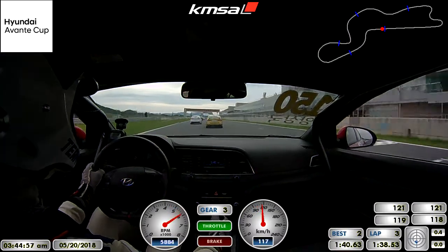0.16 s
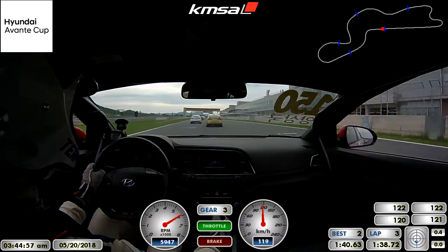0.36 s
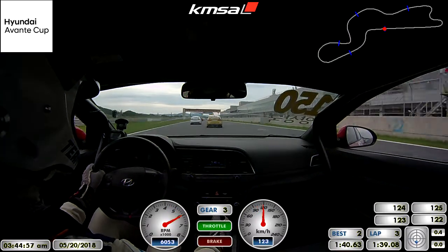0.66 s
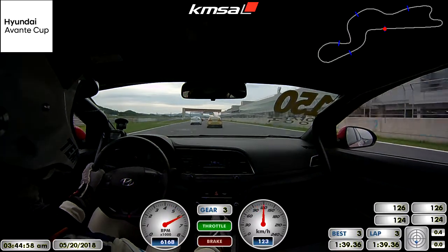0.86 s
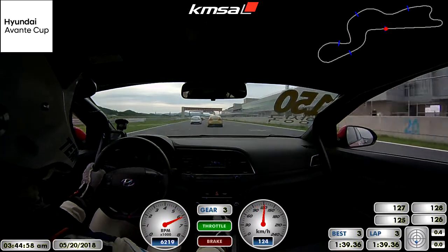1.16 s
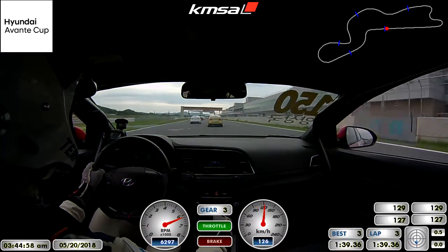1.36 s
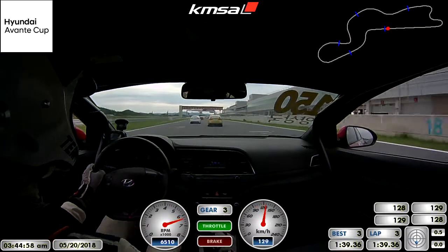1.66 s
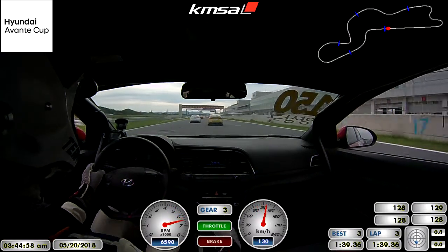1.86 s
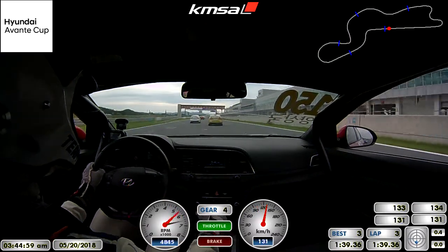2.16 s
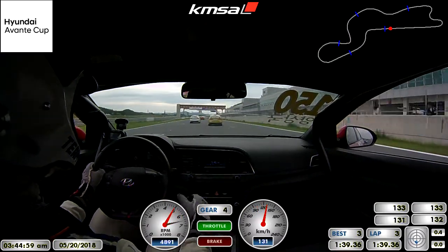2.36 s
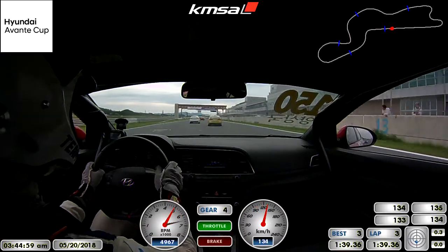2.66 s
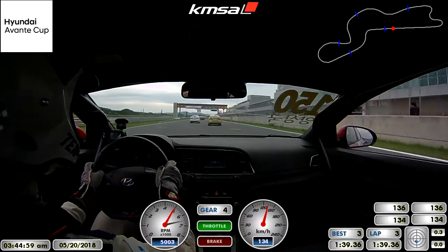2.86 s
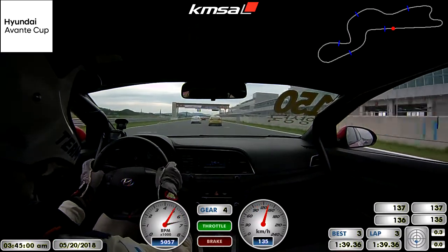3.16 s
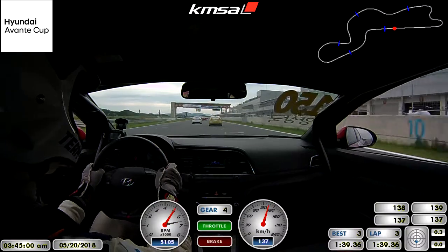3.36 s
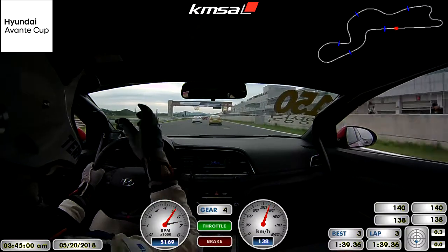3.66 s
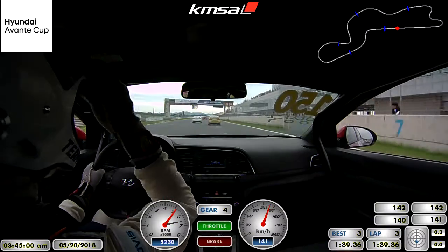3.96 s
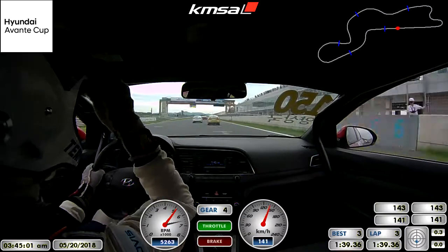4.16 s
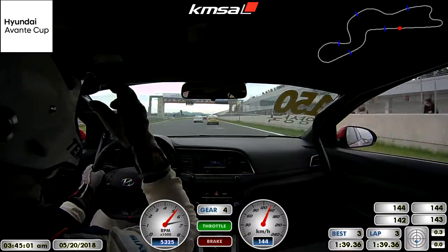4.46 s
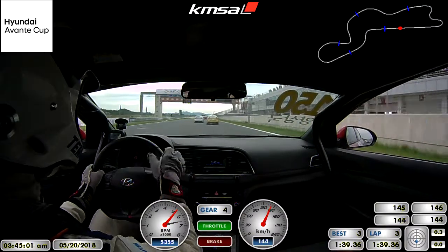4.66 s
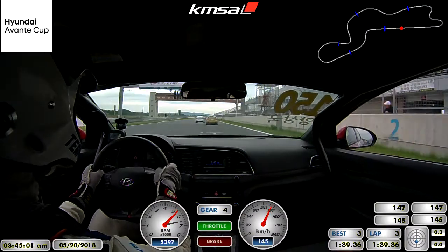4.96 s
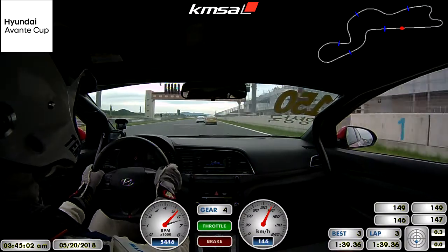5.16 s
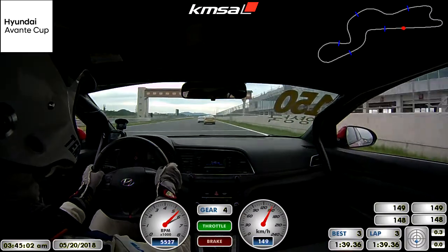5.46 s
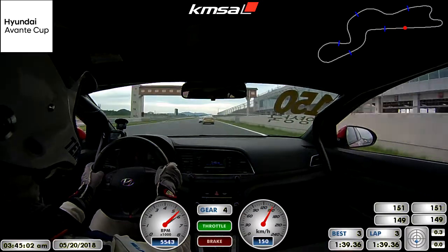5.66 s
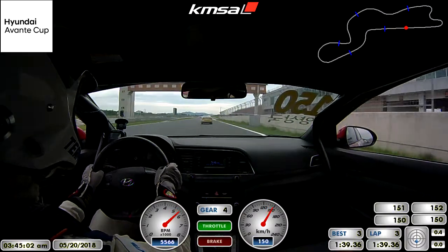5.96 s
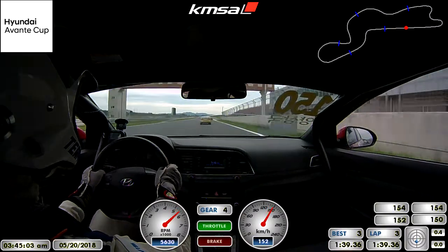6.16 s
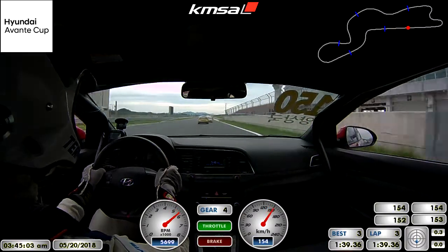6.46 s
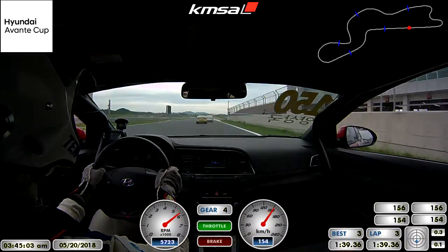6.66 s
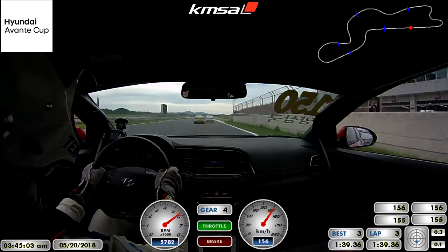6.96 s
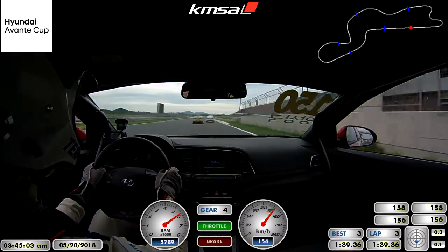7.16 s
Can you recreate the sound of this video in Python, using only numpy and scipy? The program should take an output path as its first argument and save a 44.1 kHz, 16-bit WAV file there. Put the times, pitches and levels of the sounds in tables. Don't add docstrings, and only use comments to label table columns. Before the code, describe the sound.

Inside a racing saloon, a four-cylinder engine climbs at full throttle, shifts up once and climbs again over low road rumble and rattles.

```python
import sys
import numpy as np
from scipy import signal
from scipy.fft import rfft, irfft
from scipy.io import wavfile
from scipy.ndimage import map_coordinates

SR = 44100
rng = np.random.default_rng(int(sys.argv[2]) if len(sys.argv) > 2 else 0)


def boost(x):
    u = np.asarray(x, float) / 20
    return 10 ** u


def dump(signal):
    limited = np.clip(np.atleast_2d(signal).T, -1, 1)
    pcm = np.round(limited * 32767).astype(np.int16)
    wavfile.write(sys.argv[1], SR, pcm)


N = 323253


def unit(x):
    return x / np.sqrt(np.mean(x ** 2) + 1e-20)


def along(points, hz):
    f, v = np.transpose(points)
    return np.interp(np.log(hz + 1), np.log(f + 1), v)


def curves(rows):
    s, *cols = np.transpose(rows)
    return [np.interp(np.arange(N) / SR, s, c) for c in cols]


def wobble(rate):
    coarse = np.arange(0, N + 64, 64)
    knots = rng.standard_normal(int(N * rate / SR) + 4)
    return np.interp(np.arange(N), coarse, map_coordinates(knots, [coarse * rate / SR]))


def peaks(modes, hz):
    return sum(boost(2 * db) / (1 + (2 * (hz - c) / w) ** 2) ** 2 for c, w, db in modes)


def coloured(x, power):
    m = 2 ** 15
    log_gain = np.log(power(np.fft.rfftfreq(m, 1 / SR)) + 1e-14) / 2
    cep = irfft(log_gain, m)
    cep[1:m // 2] *= 2
    cep[m // 2 + 1:] = 0
    response = irfft(np.exp(rfft(cep)), m)
    lead_in = x[m:0:-1]
    return signal.fftconvolve(np.r_[lead_in, x], response)[m:m + N]


def tone(hz, level_db):
    phase = 2 * np.pi * np.cumsum(hz) / SR + rng.uniform(0, 2 * np.pi)
    return boost(level_db) * 2 ** .5 * np.sin(phase)


def orders(turns_hz, table, drift_db, drift_rate):
    return sum(tone(k * turns_hz, db + drift_db * wobble(drift_rate)) for k, db in table)


def lifted(turns_hz, multiples, modes, leak_db):
    at = np.arange(0, N, 64)
    table = []
    for k in multiples:
        power = peaks(modes, k * turns_hz[at]) + boost(2 * leak_db)
        table.append((k, np.interp(np.arange(N), at, 10 * np.log10(power))))
    return table


def swells(rows):
    t = np.arange(0, N + 64, 64) / SR
    power = sum(boost(2 * db) * np.exp(-((t - s) / half) ** 2) for s, db, half in rows) + 1e-12
    return np.interp(np.arange(N) / SR, t, 10 * np.log10(power))


def soft_start(t, rise):
    return 1 - np.exp(-(t / rise) ** 2)


def ringing(modes, t, rise):
    out = np.zeros(len(t))
    for hz, db, t60 in modes:
        level_db = db + rng.normal(0, 1.2) - 60 * t / t60
        out += boost(level_db) * np.sin(2 * np.pi * hz * t)
    return out * soft_start(t, rise)


# pitch_hz, width_hz, level_db
SHELL_MODES = [(59.7, 20, -7), (83.4, 7.5, -8.5), (107.8, 15.5, 0.5), (144.6, 13.8, 0.5), (169, 25, -5.5),
               (194.4, 24, -4), (214.8, 17.4, -4), (259, 23, -14), (316.4, 31, -19.5), (414, 11.6, -9),
               (443, 23.6, -11.5), (508, 56, -16), (557.8, 44, -8), (645, 24, -24), (679, 36, -20.5),
               (804, 76, -27.5), (901, 30, -17), (1001, 82, -14), (1068.3, 46.4, -9.5), (1147, 34, -22),
               (1195, 25, -25), (1377, 45, -29.5), (1465, 100, -25), (1568, 37, -28.5), (1590, 24, -27.5),
               (1657, 80, -30.5), (1729, 71, -29), (1829, 47, -34.5), (2214, 88, -40.5)]
# pitch_hz, level_db
SKIN_PATH = [(5, -42.5), (30, -11.5), (100, -17.5), (240, -16), (360, -26.5), (700, -27.5), (1250, -35),
             (1750, -40), (1950, -57), (5000, -87.5)]


def shell(hz):
    notch = 1 - 0.72 / (1 + ((hz - 938) / 14) ** 2)
    return (peaks(SHELL_MODES, hz) + boost(2 * along(SKIN_PATH, hz))) * np.clip(notch, .01, 1)


# time_s, firing_rate_hz
ENGINE_SPEED = [(0, 197.3), (.6, 203.2), (1.2, 210.8), (1.68, 217.6), (1.8, 225), (1.9, 192), (1.97, 186),
                (2.08, 164.5), (2.3, 163.7), (3.5, 171.9), (4.8, 180.3), (6, 187.6), (7.33, 195.4)]
# time_s, level_db
THROTTLE_LIFT = [
    (0, 0),
    (1.7, 0),
    (1.78, -16),
    (2.0, -16),
    (2.1, 0),
    (7.33, 0),
]
# pitch_hz, width_hz, order_rms_db
MOUNT_MODES = [(137, 7.7, -50), (147, 12, -48.5), (163.1, 11.1, -36.5), (177, 24, -43), (193.4, 9.3, -38.5),
               (202.2, 7, -38), (220.4, 11, -33.5), (411.4, 12, -50.5), (425, 28, -55), (439.2, 14, -45),
               (506, 37, -51), (533, 16, -47.5), (561.4, 20, -43), (660, 60, -65)]
# multiple, level_db
WEAK_CYCLE_ORDERS = [(1, -25), (2, -19), (5, -7.5), (6, -3.5), (7, -2), (8, -1), (10, -9), (11, -7.5),
                     (13, -11), (14, -6.5), (15, -3), (16, -5), (18, -11.5), (19, -16.5), (20, -5.5),
                     (21, -15)]


def engine():
    cycle_hz = curves(ENGINE_SPEED)[0] / 4 * (1 + .0005 * wobble(12))
    table = lifted(cycle_hz, (4, 9, 3, 12), MOUNT_MODES, leak_db=-62.5)
    throttle_db = curves(THROTTLE_LIFT)[0]
    table = [(k, db + k % 2 * throttle_db) for k, db in table]
    strong = orders(cycle_hz, table, drift_db=1.1, drift_rate=12)
    weak = boost(-37.5) * orders(cycle_hz, WEAK_CYCLE_ORDERS, drift_db=3.0, drift_rate=6)
    return strong + coloured(weak, shell)


# time_s, wheel_turns_hz
ROAD_SPEED = [(0, 16.7), (1.7, 18.25), (2.3, 18.65), (3.5, 19.6), (4.8, 20.55), (6, 21.4), (7.33, 22.3)]
# pitch_hz, width_hz, order_rms_db
SUSPENSION_MODES = [(20.4, 7.4, -32.5), (39.6, 6, -34), (92, 17, -54), (104, 7.4, -47.5),
                    (110.25, 4.5, -37.5), (114.3, 4, -38.5), (130, 14, -46.5)]
# multiple, level_db
WEAK_TYRE_ORDERS = [(3, 0.5), (4, -1.5), (7, -0.5), (8, -5), (9, -10)]


def wheels():
    turns_hz = curves(ROAD_SPEED)[0]
    table = lifted(turns_hz, (1, 2, 5, 6), SUSPENSION_MODES, leak_db=-57.5)
    strong = orders(turns_hz, table, drift_db=1.8, drift_rate=4)
    weak = boost(-42.5) * orders(turns_hz, WEAK_TYRE_ORDERS, drift_db=2.0, drift_rate=2.5)
    return strong + coloured(weak, shell)


# peak_s, level_db, pitch_hz
BOOM_SWELLS = [(0.044, -22, 33.26), (0.251, -21.5, 33.57), (0.463, -22.5, 33), (0.822, -26.5, 33.8),
               (1.316, -31, 33.73), (1.622, -18, 34.03), (1.854, -20.5, 32.5), (1.996, -20.5, 32.63),
               (2.193, -24.1, 33.06), (2.328, -30, 32.5), (2.45, -26, 33.45), (2.654, -27.5, 33.06),
               (2.978, -31, 36.6), (3.135, -27, 35.87), (3.626, -23, 33.59), (4.057, -28.4, 35.34),
               (4.253, -27, 35.5), (4.404, -29.5, 36.16), (4.635, -27.5, 37.2), (4.998, -25.5, 37.24),
               (5.269, -25.8, 34.3), (5.464, -31.2, 36.2), (5.705, -28, 37), (5.889, -29, 34.4),
               (6.116, -25.5, 33.3), (6.409, -30.5, 34.8), (6.732, -26, 33.1), (6.957, -29.5, 33.65),
               (7.112, -26.6, 35.94), (7.285, -31.5, 36.2)]


def boom():
    half_length_s = 0.062
    pitch_hz = curves([(s, hz) for s, db, hz in BOOM_SWELLS])[0]
    level_db = swells([(s, db - 1.5, half_length_s) for s, db, hz in BOOM_SWELLS])
    return tone(pitch_hz, level_db)


# time_s, level_db
ROUGHNESS = [(0.0, -28.5), (0.69, -35.5), (1.47, -37), (1.65, -37.5), (2.08, -39.5), (2.59, -30.5),
             (2.86, -38), (3.55, -37), (4.41, -34), (6.33, -36.5), (7.33, -33.5)]
# pitch_hz, width_hz, level_db
RUMBLE_MODES = [(12, 8.4, -11.5), (27, 5.1, -1), (39.3, 7.4, -3)]


def road():
    buzz_level_db, rough_share, revs_power = -41, .3, 1.2
    wind_level_db, speed_power = -56, 1.3
    rough_db = curves(ROUGHNESS)[0]
    revs = curves(ENGINE_SPEED)[0]
    speed = curves(ROAD_SPEED)[0]
    buzz_db = buzz_level_db + rough_share * (rough_db - rough_db.mean())
    buzz_db = buzz_db + revs_power * 20 * np.log10(revs / revs.mean())
    wind_db = wind_level_db + speed_power * 20 * np.log10(speed / speed.mean())

    def under(hz, edge_hz):
        return 1 / (1 + (hz / edge_hz) ** 8)

    def rumble_band(hz):
        return peaks(RUMBLE_MODES, hz)

    def drone_band(hz):
        return shell(hz) * under(hz, 298)

    def buzz_band(hz):
        return shell(hz) * (1 - under(hz, 312)) * under(hz, 1366)

    def wind_band(hz):
        return shell(hz) * (1 - under(hz, 1380))

    grit = rng.standard_normal((4, N))
    rumble = coloured(grit[0], rumble_band)
    drone = coloured(grit[1] * boost(1.9 * wobble(14)), drone_band)
    buzz = coloured(grit[2] * boost(0.89 * wobble(40)), buzz_band)
    wind = coloured(grit[3], wind_band)
    bed = boost(rough_db - 3.0) * unit(drone)
    bed += boost(buzz_db - 0.65) * unit(buzz)
    bed += boost(wind_db + 2.5) * unit(wind)
    return boost(-38.5) * unit(rumble) + bed


# pitch_hz, level_db_per_hz
HISS_CURVE = [(1120, -23), (1900, -2), (2500, -3), (3900, -4), (4630, -4.5), (5540, -4.5), (6900, -8.5),
              (7500, -14), (8200, -24), (8700, -34), (9100, -51.5), (10000, -91)]


def camera_hiss():
    def hiss_band(hz):
        return boost(2 * along([(20, -10.0), *HISS_CURVE], hz))

    return boost(-59.0) * unit(coloured(rng.standard_normal(N), hiss_band))


# pitch_hz, rms_db
CLOCK_TONES = [(2000, -83), (3000, -80), (4000, -79), (5000, -78), (6000, -79), (7000, -83), (8000, -96)]


def camera_clock():
    t = np.arange(N) / SR
    return sum(boost(db) * 2 ** .5 * np.sin(2 * np.pi * hz * t) for hz, db in CLOCK_TONES)


# start_s, floor_pan_db, firewall_db, roof_db
ROAD_JOINTS = [(.005, -36, -27, -32), (0.056, -44, -25.5, -39), (0.211, -46, -39, -33.5),
               (1.504, -23, -28, -22), (1.525, -28, -39, -49), (1.632, -34, -27.5, -33),
               (1.92, -45, -25, -43.5), (1.991, -45, -29, -40), (2.486, -27, -24, -21),
               (2.506, -23.5, -24.5, -44), (3.399, -42, -27, -38.5), (4.911, -46, -29.5, -30.5),
               (6.0, -37.5, -30, -54), (6.121, -36, -49, -51), (6.6, -45, -30.5, -49),
               (6.99, -42, -24.5, -47)]
# pitch_hz, level_db, t60_s
PAN_MODES = [(125, -8.5, 0.17), (152.2, 6.5, 0.15)]
# pitch_hz, level_db, t60_s
FIREWALL_MODES = [(201.4, 3.5, 0.17), (216, -8, 0.12), (260, -16, 0.18)]
# pitch_hz, level_db, t60_s
ROOF_MODES = [(412.3, -4.5, 0.39), (440, -9.5, 0.077), (500, -8, 0.072), (554, -10.5, 0.15)]


def joints():
    out = np.zeros(N + SR)
    t = np.arange(SR // 2) / SR
    for s, pan_db, wall_db, roof_db in ROAD_JOINTS:
        hit = boost(pan_db) * ringing(PAN_MODES, t, rise=0.0044)
        hit += boost(wall_db) * ringing(FIREWALL_MODES, t, rise=0.0048)
        hit += boost(roof_db) * ringing(ROOF_MODES, t, rise=0.0087)
        out[round(s * SR):][:len(t)] += hit
    return out[:N]


# peak_s, level_db, low_ring_db
BRACKET_RATTLES = [(0.03, -26.5, -6), (0.0854, -35, -14), (0.3645, -25, -22), (0.7537, -29.5, -9),
                   (0.81, -24.5, -6), (0.8714, -33, 12), (1.2046, -31.5, -18), (1.265, -21.5, -5),
                   (1.4243, -26.5, 0), (1.6387, -27, -12), (1.8238, -20, 3), (1.8344, -26, -1),
                   (1.8632, -16, -23), (1.9167, -27.5, 8), (1.9453, -31.5, -2), (2.1333, -33, 2),
                   (2.1458, -24.5, 8), (2.2518, -23.5, -4), (2.4155, -21, -10), (2.9367, -32, -15),
                   (2.9934, -31, 5), (3.1502, -27.5, 4), (3.258, -30.5, 3), (3.6698, -38, -11),
                   (4.0696, -29.5, 3), (4.175, -33, -4), (4.5171, -28.5, -16), (5.3009, -31, -16),
                   (6.3803, -32.5, 4), (6.6831, -34, -8)]
# pitch_hz, level_db, t60_s
BRACKET_MODES = [(1015.6, -13, 0.15), (1090, -19.5, 0.19), (1490, -32, .04), (1610, -31.5, .04)]


def rattles():
    chatter_hz, chatter_spread_hz = 1046.5, 12.4
    ticks_per_s, tick_db, tick_spread_db = 30, -41.5, 3.5
    out = np.zeros(N + SR)
    t = np.arange(SR // 5) / SR
    contact = t / .006 * np.exp(1 - t / .006) * soft_start(t, .0025)
    low_panel = np.sin(2 * np.pi * 548 * t)
    luck = rng.random((ticks_per_s * N // SR, 2))
    ticks = [(.01 + when * N / SR, tick_db + tick_spread_db * size, -8) for when, size in luck]
    for s, db, low_db in list(BRACKET_RATTLES) + ticks:
        hz = rng.normal(chatter_hz, chatter_spread_hz)
        chatter = contact * (np.sin(2 * np.pi * hz * t) + boost(low_db - 9) * low_panel)
        hit = chatter + ringing(BRACKET_MODES, t, rise=0.0027)
        out[round((s - .0025) * SR):][:len(t)] += boost(db - 4.5) * hit
    return out[:N]


# peak_s, level_db, half_length_s
SQUEAK_BURSTS = [(.14, -62, 0.021), (.28, -67, .15), (1.2, -71, .1), (1.73, -67, .02), (3.8, -62, 0.11),
                 (3.94, -64, .02), (4.1, -68, .08), (4.82, -62.5, .04), (5.04, -65, .06), (5.27, -63, .03),
                 (5.57, -61, 0.094), (6.25, -63, 0.046), (6.47, -67, .1)]
# start_s, level_db, pitch_hz
TRIM_CHIRPS = [(0.195, -49, 5410), (1.506, -42.5, 5410), (1.72, -47, 5750), (1.8228, -54, 5170),
               (2.4896, -41, 5400), (2.7801, -59, 5400), (2.8539, -52, 5420), (3.2635, -49, 5340),
               (5.3462, -53, 5430), (5.4959, -56, 5560), (5.7871, -60, 5430), (6.1135, -49, 5450),
               (6.1724, -52, 5540), (6.2203, -48, 5500), (6.9017, -53, 5530)]


def trim():
    hum_rest_db, squeak_rest_db, hum_share = -73, -74, .4
    chirps = np.zeros(N + SR)
    t = np.arange(SR // 10) / SR
    for s, db, hz in TRIM_CHIRPS:
        fade = boost(db - 6.5 - 60 * t / 0.062)
        chirps[round(s * SR):][:len(t)] += fade * np.sin(2 * np.pi * hz * t) * soft_start(t, 0.0023)
    squeak_db = 10 * np.log10(boost(2 * swells(SQUEAK_BURSTS)) + boost(2 * squeak_rest_db))
    hum_db = hum_rest_db + hum_share * (squeak_db - squeak_rest_db)

    def hum_band(hz):
        return peaks([(5410, 120, 0)], hz)

    def squeak_band(hz):
        return peaks([(5660, 90, -2.0), (5720, 150, -1), (5170, 150, -7.5), (4000, 540, -10)], hz)

    hum = coloured(rng.standard_normal(N) * boost(1.1 * wobble(80)), hum_band)
    squeak = coloured(rng.standard_normal(N) * boost(3.2 * wobble(50)), squeak_band)
    return chirps[:N] + boost(hum_db + 1.5) * unit(hum) + boost(squeak_db - 1.5) * unit(squeak)


def scene():
    return (engine() + wheels() + boom() + road() + joints() + rattles() + trim())[None]


def top_cut(x):
    return signal.sosfilt(signal.butter(12, 9050, fs=SR, output="sos"), x)


def record(dry):
    mix = dry + camera_hiss() + camera_clock()
    return top_cut(mix)


dry = scene()
out = record(dry)
dump(out)
```